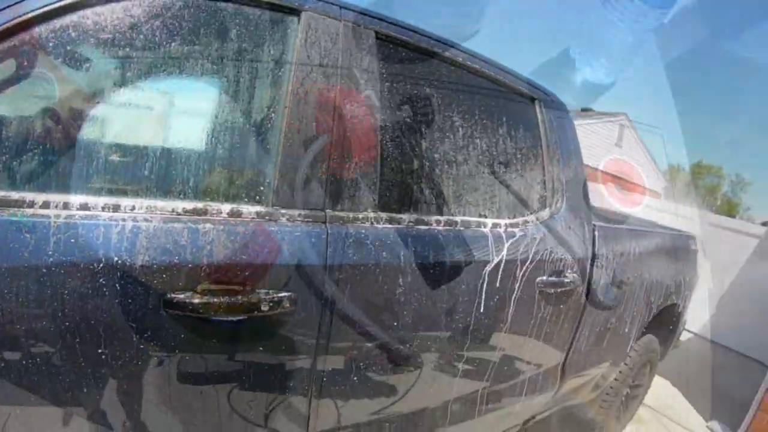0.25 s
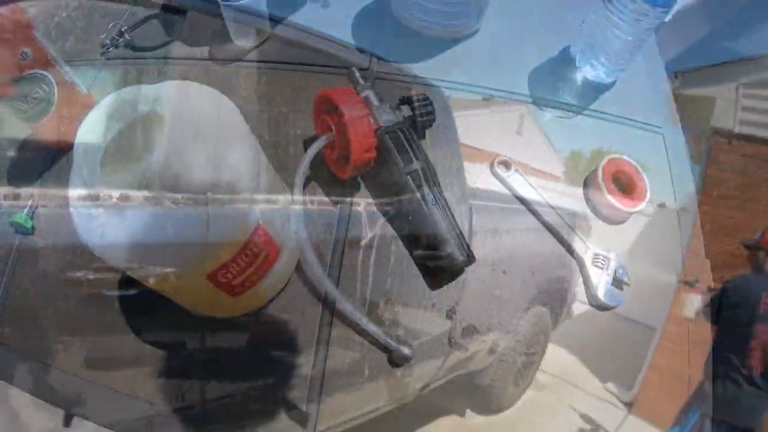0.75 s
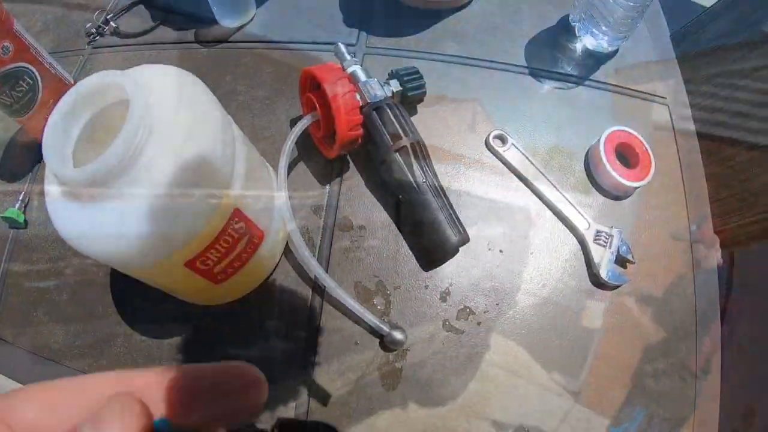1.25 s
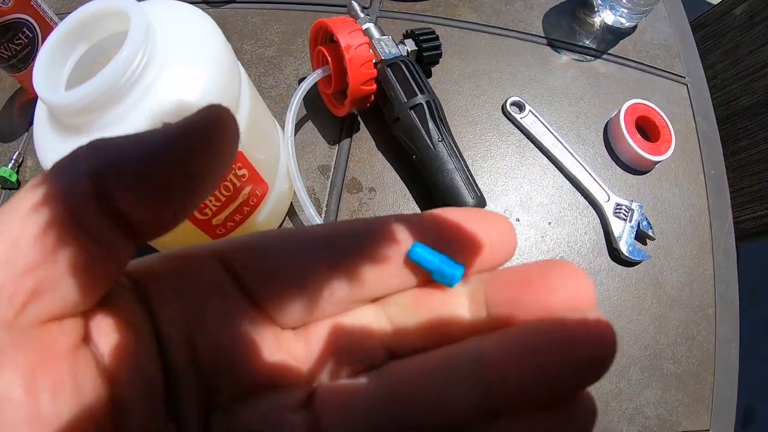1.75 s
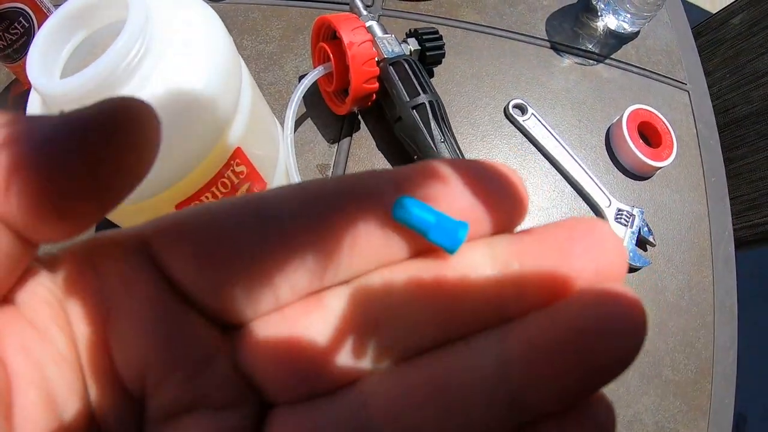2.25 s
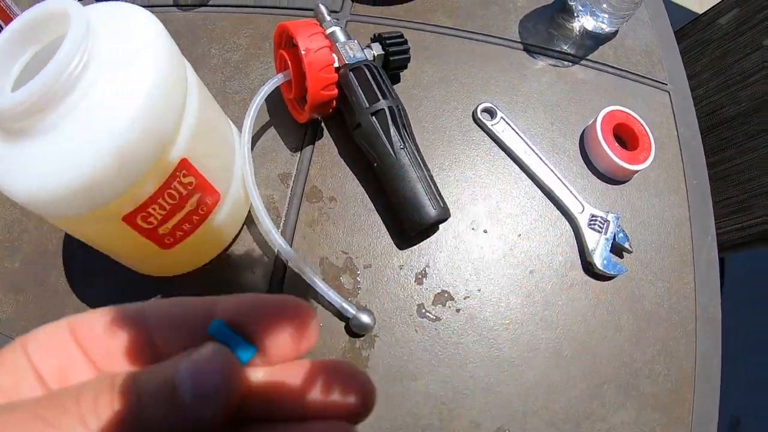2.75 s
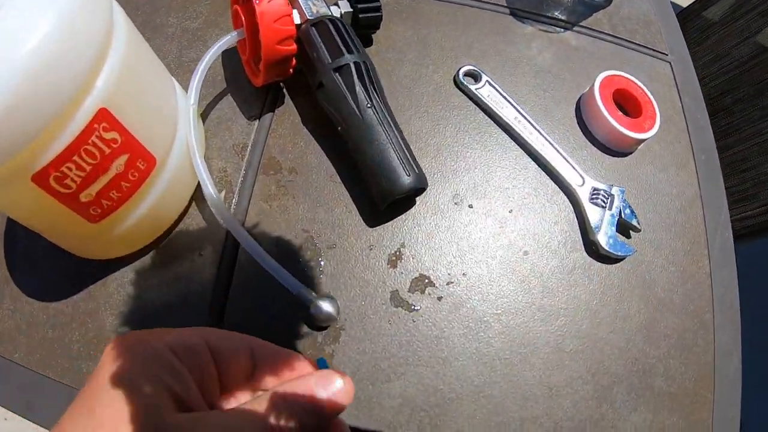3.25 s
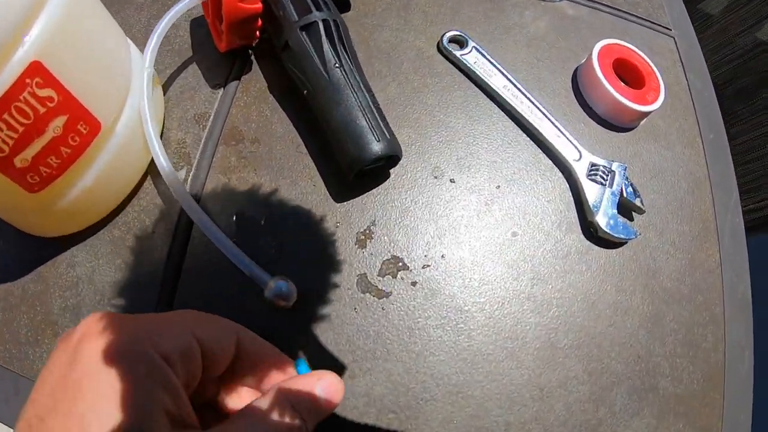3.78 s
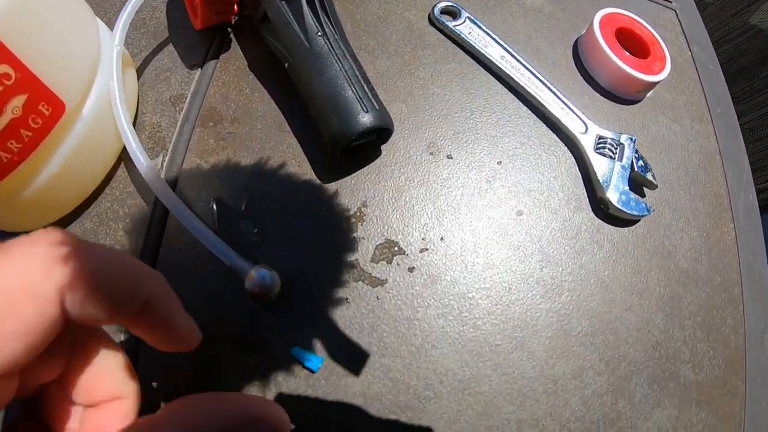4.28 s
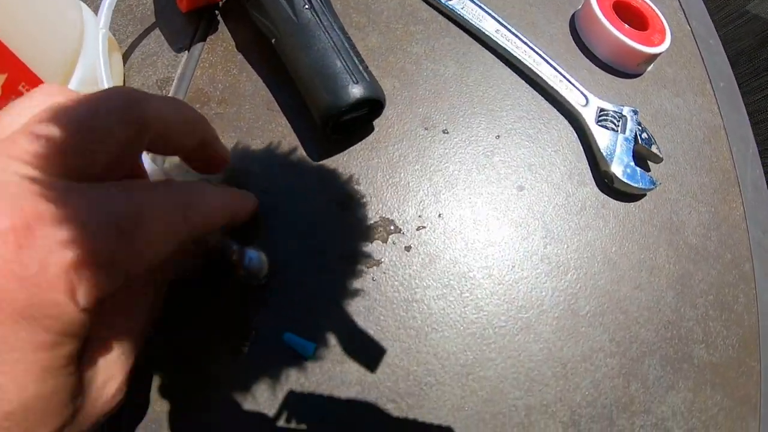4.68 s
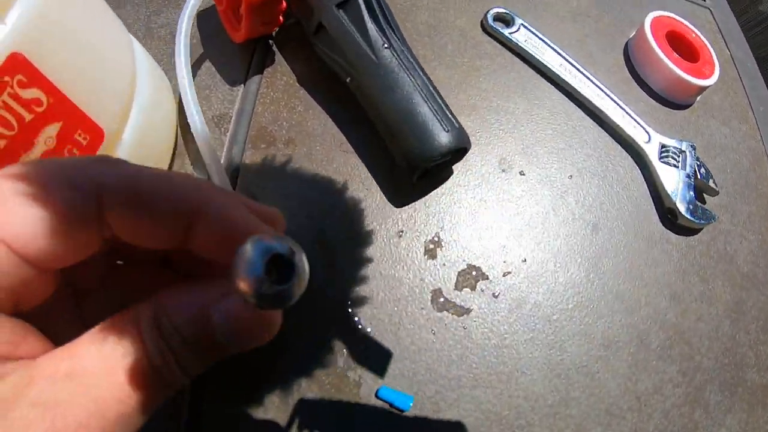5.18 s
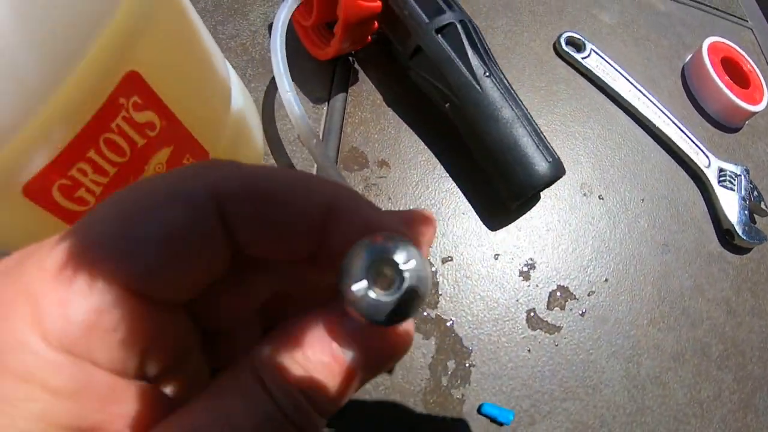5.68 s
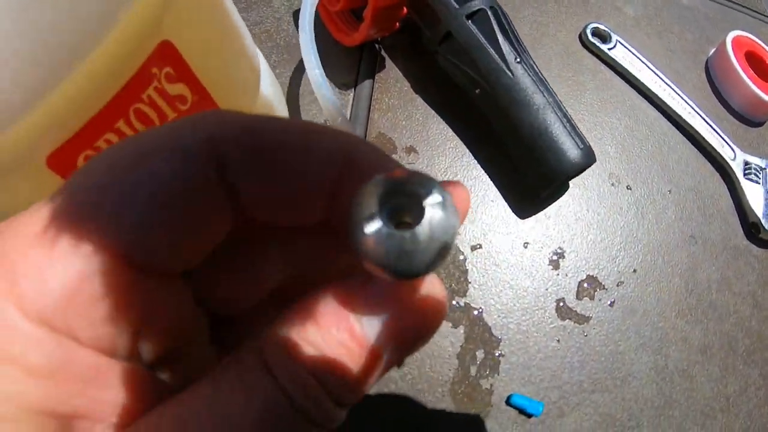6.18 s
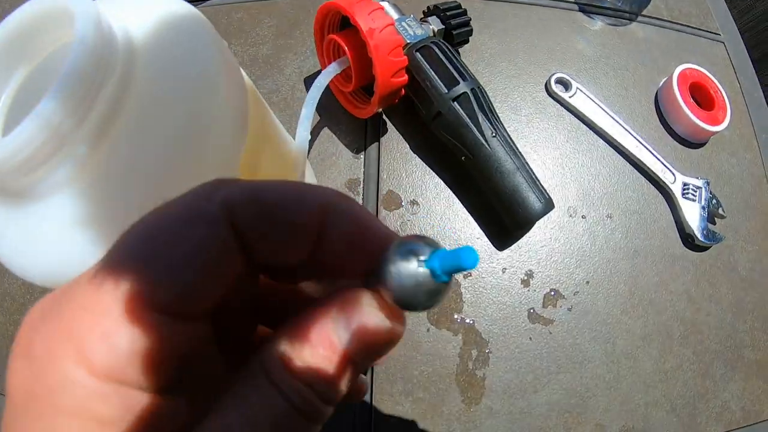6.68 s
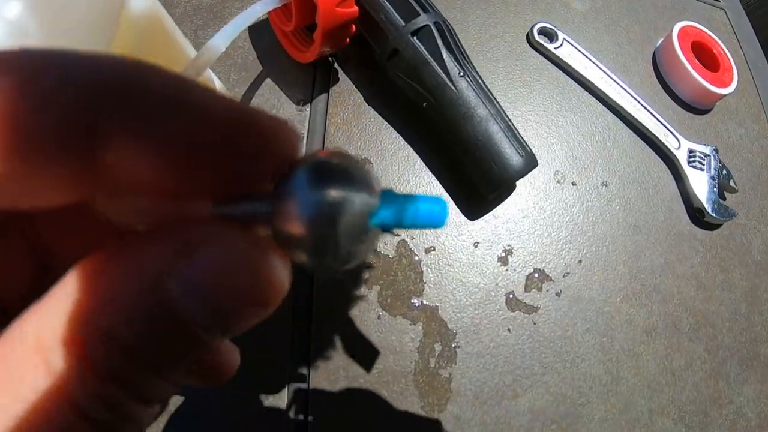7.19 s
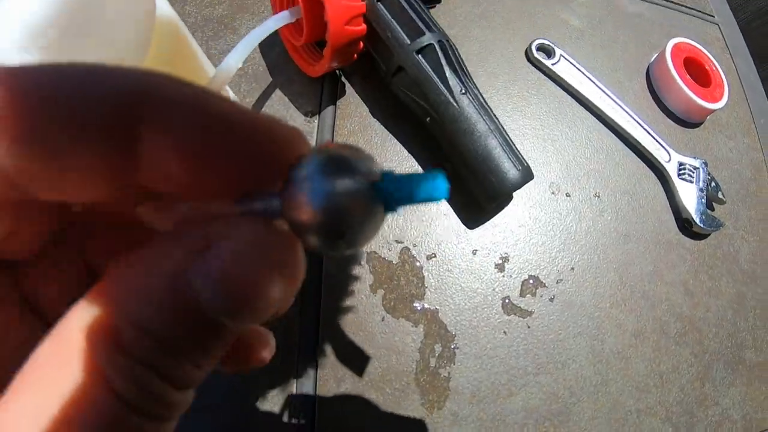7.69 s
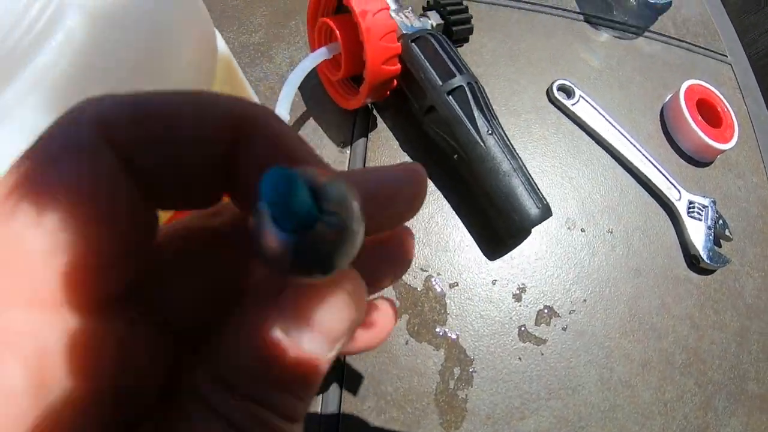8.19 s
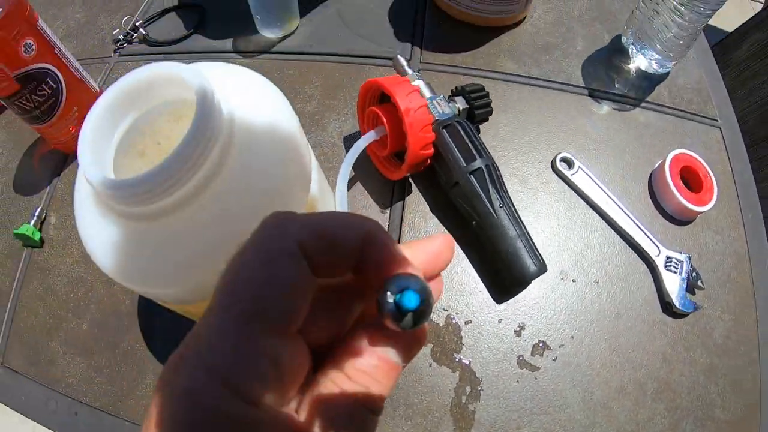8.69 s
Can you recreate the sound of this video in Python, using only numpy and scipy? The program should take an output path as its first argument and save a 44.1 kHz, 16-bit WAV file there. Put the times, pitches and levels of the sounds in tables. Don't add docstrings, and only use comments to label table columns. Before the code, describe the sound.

Outdoors on a driveway, a small four-stroke pressure washer putters close to the microphone with a wide spray hiss, then fades. The same engine continues from across the drive, a centred, steady low buzz with ringing metal and pump clatter. Light wind bumps the microphone. Foam spray swells over it, everything cuts abruptly to about half a second of silence, and the distant engine comes back until the end.

```python
import sys
import numpy as np
from scipy import signal
from scipy.fft import rfft, irfft
from scipy.io import wavfile
from scipy.ndimage import uniform_filter1d

SR = 44100
rng = np.random.default_rng(int(sys.argv[2]) if len(sys.argv) > 2 else 0)


def pcm_store(signal):
    levels = np.round(np.clip(np.atleast_2d(signal), -1, 1) * 32767)
    wavfile.write(sys.argv[1], SR, levels.astype(np.int16).T)


def linear_from_db(decibels):
    return 10 ** (np.asarray(decibels, float) / 20)


N = 394254

NEAR_RATE, FAR_RATE = 27.85, 30.85
HUNT_FIRINGS, HUNT_PER_S = .003, 4
# [t/s, lead over the steady pace/firings]
NEAR_PACE = [(0.06, -0.102), (0.25, -0.12), (0.58, -0.106), (0.84, -0.085), (0.97, -0.1), (1.1, -0.091)]
FAR_PACE = [(1.5, 0.475), (1.72, 0.495), (1.9, 0.473), (2.2, 0.506), (2.4, 0.482), (2.75, 0.51), (3.8, 0.5),
            (4.6, 0.452), (5.1, 0.492), (5.4, 0.502), (6.2, 0.453), (6.31, 0.494), (6.9, 0.558),
            (7.5, 0.593), (7.95, 0.606), (8.14, 0.586), (8.32, 0.603), (8.92, 0.622)]
# [multiple of the firing rate, level/dB]
NEAR_MUFFLER = [(1, -15.5), (2, -9), (3, 0), (4, -1), (5, -7), (6, -7.5), (7, -6.5), (8, -19.5), (9, -12.5),
                (10, -13), (11, -21), (12, -30), (13, -16.5), (14, -26), (15, -25), (16, -25.5),
                (17, -17.5), (18, -40), (19, -25.5), (20, -23.5), (21, -22.5), (22, -22), (23, -22),
                (24, -20.5), (25, -19), (26, -32), (27, -30.5), (28, -19.5)]
FAR_MUFFLER = [(1, -23), (2, -19), (3, -12), (4, -26), (5, -10), (6, 0), (7, -10), (8, -17), (9, -15),
               (10, -14), (11, -19), (12, -13), (13, -21), (14, -24), (15, -22), (16, -24), (17, -22),
               (18, -34), (19, -44), (20, -27), (21, -34), (22, -34), (23, -37), (24, -41), (25, -45),
               (26, -38), (27, -43), (28, -31), (29, -42), (30, -33)]
NEAR_WALLS = [(0.98, 2.9), (11.9, 11.5)]
FAR_WALLS = [(0.88, 1.3), (3.36, 9), (5.21, 19), (18.6, 12), (24.6, 9)]
# [t/s, level/dB]
NEAR_FADE_OUT = [(0, 2.5), (.4, 0.5), (.8, -2.5), (1.2, -6), (1.45, -12.5), (1.6, -19.5), (1.72, -28),
                 (1.78, -75)]
# [f/Hz, level/dB per Hz]
CHUFF_SPECTRUM = [(410, -41.5), (750, -0.5), (1000, -5), (1840, -11.5), (4300, -12), (5500, -8.5),
                  (7500, -9), (8000, -11.5), (10500, -19.5), (12000, -32.5), (13100, -28), (14100, -32.5),
                  (15600, -44), (16500, -100)]
JET_SPECTRUM = [(24, -35), (40, -13), (76, -9), (278, -18.5), (406, -23.5), (600, -22), (1400, -21),
                (2500, -22.5), (5500, -23), (7500, -25), (8200, -29.5), (10600, -37.5), (12000, -51.5),
                (13200, -48.5), (15600, -66.5), (16500, -110)]
# [f/Hz, likeness 0-1]
LIKENESS = [(60, 0.81), (130, 0.82), (270, 0.8), (560, 0.39), (1170, 0.74), (2470, 0.68), (5190, 0.05),
            (10900, 0.21)]
# [f/Hz, left over right/dB]
BALANCE = [(60, 2), (170, 9.5), (480, -3), (1360, -10), (3860, -5.5), (10900, -10.5)]
NEAR_EXHAUST_DB, NEAR_HISS_DB, NEAR_CHUFF_DB = -21, -29, -32

# [f/Hz, level/dB per Hz]
CLATTER_SPECTRUM = [(200, -35), (330, -13.5), (520, -10.5), (750, -16.5), (950, -21), (1150, -21),
                    (1500, -20.5), (1900, -24.5), (2400, -23.5), (2700, -25.5), (4300, -30.5),
                    (6000, -35.5), (6700, -42), (8000, -72)]
TOP_SPECTRUM = [(5500, -25), (6600, 0), (7400, 2), (8200, -3), (9050, 0), (9700, -10), (10400, 0),
                (11000, -8), (12100, -8), (13000, -14), (14000, -19), (15100, -25), (15400, -60)]
# [t/s, top octaves/dB]
TURNING = [
    (1.4, 2),
    (3.0, 0),
    (4.2, -2.5),
    (6.0, 0),
    (6.33, 7),
    (6.92, -5.5),
    (7.5, -2),
    (8.3, 0),
    (8.94, 4),
]
# [f/Hz, width/Hz, spells unshaded by the hand: [start t/s, length/s, level/dB]]
COWLING = [
    (1465, 38, [(1.3, 0.9, -48.5), (2.85, 1.6, -45.5), (5.0, 1.1, -48), (8.0, 1.2, -52)]),
    (1783, 72, [(3.7, 3.2, -51.5), (8.0, 0.36, -51), (8.4, .6, -41.5)]),
    (2328, 48, [(1.3, 1.5, -49.5), (3.1, 1.9, -45.5), (5.0, 0.67, -52.5), (6.85, 1.59, -41.5)]),
    (3360, 70, [(1.3, 1.0, -50.5), (2.6, 0.62, -50), (8.45, 0.66, -47)]),
]
MORE_RINGS = [
    (954, 38, [(1.3, 4.2, -45.5), (7.1, 1.3, -51.5)]),
    (2114, 42, [(1.3, 1.7, -52.5), (4.1, .9, -48), (5.0, 1.3, -46), (7.2, 1.4, -49)]),
    (2472, 50, [(1.3, 1.5, -47), (7.1, 0.67, -58)]),
    (2880, 250, [(2.9, .9, -46), (7.2, 2.2, -56)]),
    (3630, 140, [(1.3, .5, -52), (2.35, 0.7, -49), (8.5, 0.45, -60)]),
    (4250, 500, [(5.5, 0.94, -45.5), (8.2, 0.95, -55)]),
]
SHADED_DB, SHADE_EDGE_S, SHADE_FLICKER_DB = -64, 0.3, 0.4
FAR_EXHAUST_DB, CLATTER_DB, TOP_HISS_DB = -14, -34, -58
CLATTER_FOLLOWS = .3
CROSSFADE_LOSS_DB = 1

# [t/s, level/dB]
SPRAY_FADE_IN = [
    (5.32, -75),
    (5.4, -51),
    (5.6, -44.5),
    (5.9, -39),
    (6.34, -38),
]
# [f/Hz, level/dB per Hz]
SPRAY_SPECTRUM = [(300, -20), (600, 0), (800, -8), (1600, -2), (2250, -4), (2600, -17), (3200, -13),
                  (3900, -17), (4700, -9), (7400, -11), (10300, -16), (11300, -26), (12300, -25),
                  (14200, -34), (14800, -70)]
HUM_HZ, HUM_DB = 121.1, -36.5
# [start t/s, length/s, wind over calm/dB, bass cut by the wind filter/dB]
WIND_GUSTS = [
    (1.442, .3, 9.5, 0),
    (1.747, .3, 2, 3),
    (2.69, .2, 4.5, 6),
    (2.896, 1.1, 8, -0.5),
    (3.15, 0.57, 3, 7.5),
    (4.508, 0.32, 6, -1.5),
    (6.855, .25, -2, 5),
    (7.65, 0.23, 13, 2),
    (8.3, .7, 7, 1.5),
]
CALM_DB, CALM_BASS_DB, GUST_EDGE_S = -44, 0.5, 0.11
# [start t/s, length/s, level/dB]
SELF_NOISE = [
    (2.101, 4, -69.5),
    (7.798, 1.2, -76.5),
]
# [start t/s, end t/s]
FAR_FADE_INS = [
    (1.255, 1.345),
    (6.823, 6.905),
]
CUT_S = 6.3383


def firings(rate, lead):
    hunting = uniform_filter1d(in_time(lead), size=2500) + HUNT_FIRINGS * drift(HUNT_PER_S)
    return rate * np.arange(N) / SR + hunting


def exhaust(count, orders, wander_db, lags, bass_db=0):
    level = np.log(linear_from_db(np.array(orders)[:, 1]))
    beyond = np.full(64 - len(level), level[-1] - .7)
    cepstrum = irfft(np.r_[level[0] - 1.4, level, beyond])
    cepstrum[1:64] *= 2
    cepstrum[65:] = 0
    k = np.arange(1, len(level) + 1)
    partials = np.exp(rfft(cepstrum))[k]
    phase = np.angle(partials)
    for at, sharp in lags:
        phase = phase - 2 * np.arctan2(k / at / sharp, 1 - (k / at) ** 2)
    out = 0
    for order, size, start in zip(k, abs(partials), phase):
        gain_db = wander_db * np.sqrt(order) * drift(2.8) + bass_db * (order < 4)
        slip = (order / 23) ** 4 * drift(4)
        out = out + size * linear_from_db(gain_db) * np.cos(2 * np.pi * order * count + start + slip)
    return rms_one(out)


def burst(count, delay, width, spread_db):
    size = linear_from_db(rng.normal(0, spread_db, 700)[(count - delay + .5).astype(int) % 700])
    return size * np.exp((np.cos(2 * np.pi * (count - delay)) - 1) / (2 * np.pi * width) ** 2)


def near_position():
    count, size = firings(NEAR_RATE, NEAR_PACE), 2 * SR
    thud = linear_from_db(NEAR_EXHAUST_DB) * exhaust(count, NEAR_MUFFLER, wander_db=.25, lags=NEAR_WALLS)
    gas = noise(CHUFF_SPECTRUM, slow_db=.4, fast_db=1.2, size=size, wide=True, count=5)
    chuff = linear_from_db(NEAR_CHUFF_DB + 9.5) * gas * burst(count, delay=0.12, width=0.06, spread_db=1.2)
    jet = noise(JET_SPECTRUM, slow_db=.3, fast_db=1.5, size=size, wide=True)
    hiss = linear_from_db(NEAR_HISS_DB) * jet
    return (thud + chuff + hiss) * linear_from_db(in_time(NEAR_FADE_OUT)) * (np.arange(N) < size)


def far_position():
    count = firings(FAR_RATE, FAR_PACE)
    wind_db, bass_db = CALM_DB, CALM_BASS_DB
    for start, length, gust_db, cut_db in WIND_GUSTS:
        gust = span(start, length, GUST_EDGE_S)
        wind_db = wind_db + gust_db * gust
        bass_db = bass_db - cut_db * gust
    note = exhaust(count - .013, FAR_MUFFLER, wander_db=.15, lags=FAR_WALLS, bass_db=bass_db)
    metal = rattle(count, COWLING) + rattle(count, MORE_RINGS)
    engine = linear_from_db(FAR_EXHAUST_DB) * note + clatter(count) + metal
    dip_db = CROSSFADE_LOSS_DB * (span(0, 1.5, .3) + span(5.6, 1, .4))
    return linear_from_db(-dip_db) * (engine + hum() + wind(wind_db))


def clatter(count):
    facing_db = in_time(TURNING)
    throb = 1.11 + 0.098 * burst(count, delay=0.54, width=0.16, spread_db=0)
    body = throb * noise(CLATTER_SPECTRUM, slow_db=.4, fast_db=0.5, count=6)
    tick = .5 * linear_from_db(facing_db) * burst(count, delay=.03, width=0.025, spread_db=4.5)
    top = (throb + tick) * noise(TOP_SPECTRUM, slow_db=0, fast_db=1.7, count=5)
    return linear_from_db(CLATTER_DB + CLATTER_FOLLOWS * facing_db) * body + linear_from_db(TOP_HISS_DB + facing_db) * top


def rattle(count, resonances):
    knock = np.diff(np.floor(count), prepend=0) > 0
    knock = 24 * knock * burst(count, delay=0, width=0.098, spread_db=2)
    shake = .8 + .4 * burst(2 * count, delay=.2, width=.15, spread_db=0)
    out = 0
    for hz, width, open_spells in resonances:
        r = np.exp(-np.pi * width / SR)
        poles = [1, -2 * r * np.cos(2 * np.pi * hz / SR), r * r]
        ring = signal.lfilter([1, 0, -1], poles, knock + shake * rng.standard_normal(N))
        level = linear_from_db(SHADED_DB) + spells(open_spells, SHADE_EDGE_S)
        out = out + level * linear_from_db(SHADE_FLICKER_DB * drift(0.83)) * rms_one(ring)
    return signal.sosfilt(signal.butter(6, 5000, fs=SR, output="sos"), out)


def returning_spray():
    started = np.arange(N) / SR > SPRAY_FADE_IN[0][0]
    return noise(SPRAY_SPECTRUM, slow_db=.3, fast_db=1, wide=True) * linear_from_db(in_time(SPRAY_FADE_IN)) * started


def hum():
    return linear_from_db(HUM_DB) * np.sqrt(2) * np.sin(2 * np.pi * HUM_HZ * np.arange(N) / SR + 1.9)


def wind(level_db):
    puffs = band_pass(rng.standard_normal(N), 2, 25, 160)
    return linear_from_db(level_db + 2 * drift(7.1)) * rms_one(puffs)


def microphone_hiss():
    own = band_pass(rng.standard_normal(N), 3, 11300, 13800)
    return spells(SELF_NOISE, .3) * rms_one(own) * [[1], [-1]]


def noise(spectrum, slow_db, fast_db, size=N, wide=False, count=3):
    white = rng.standard_normal((2, 2 if wide else 1, size))
    bottom, top = spectrum[0][0], spectrum[-1][0]
    edges = np.geomspace(bottom, top, int(count * np.log2(top / bottom)) + 1)
    out = 0
    for k, (low, high) in enumerate(zip(edges, edges[1:])):
        band = band_pass(white[k % 2], 2, low, high)
        if wide:
            middle = np.sqrt(low * high)
            alike, lean = at_hz(LIKENESS, middle), at_hz(BALANCE, middle) / 2
            shared, apart = np.sqrt(1 + alike) * band[0], np.sqrt(1 - alike) * band[1]
            band = (shared + apart * [[1], [-1]]) * linear_from_db([[lean], [-lean]])
        out = out + band * linear_from_db(slow_db * drift(0.95)[:size] + fast_db * drift(24)[:size])
    hz = np.maximum(np.arange(size // 2 + 1) * SR / size, 1)
    coloured = irfft(rfft(out) * linear_from_db(at_hz(spectrum, hz)), size)
    return np.pad(rms_one(coloured), ((0, 0), (0, N - size)))


def drift(rate):
    r = np.exp(-2 * np.pi * rate * 40 / SR)
    slow = signal.lfilter([1], [1, -2 * r, r * r], rng.standard_normal(N // 40 + 2002))
    slow = rms_one(slow[2000:])
    return np.interp(np.arange(N) / 40, np.arange(len(slow)), slow)


def span(start, length, edge):
    t = np.arange(N) / SR
    return np.clip(np.minimum(t - start, start + length - t) / edge + .5, 0, 1)


def spells(rows, edge):
    return sum(linear_from_db(db) * span(start, length, edge) for start, length, db in rows)


def in_time(rows):
    s, value = np.transpose(rows)
    return np.interp(np.arange(N) / SR, s, value)


def at_hz(points, hz):
    f, value = np.transpose(points)
    return np.interp(np.log(hz), np.log(f), value)


def band_pass(x, order, low, high):
    return signal.sosfilt(signal.butter(order, [low, high], "band", fs=SR, output="sos"), x)


def rms_one(x):
    return x / np.sqrt(np.mean(x ** 2) + 1e-20)


def scene():
    t = np.arange(N) / SR
    first, second = (np.sin(np.pi / 2 * np.clip((t - a) / (b - a), 0, 1)) ** 2 for a, b in FAR_FADE_INS)
    before_cut = t < CUT_S
    far = far_position() * (first * before_cut + second)
    return near_position() + far + returning_spray() * before_cut


def band_limit(x):
    return signal.sosfilt(signal.butter(12, 15750, fs=SR, output="sos"), x)


def record(dry):
    return band_limit(dry + microphone_hiss())


dry = scene()
out = record(dry)
pcm_store(out)
```